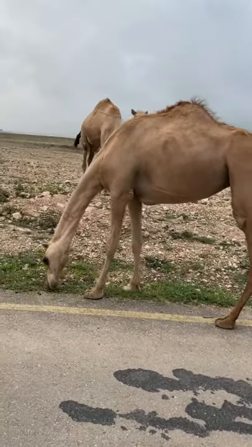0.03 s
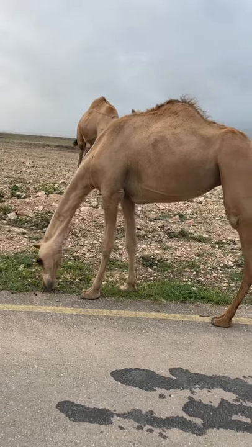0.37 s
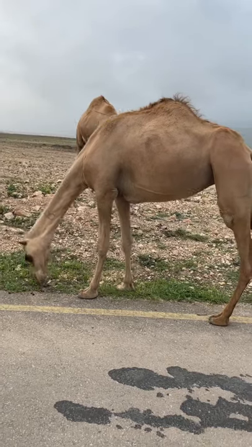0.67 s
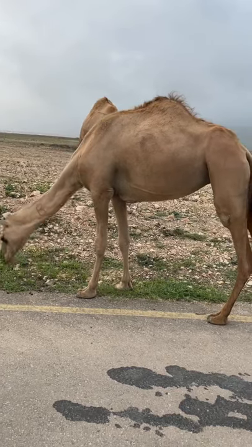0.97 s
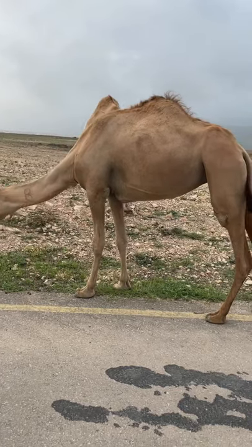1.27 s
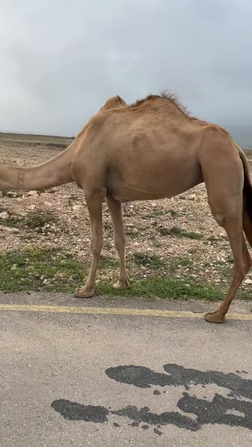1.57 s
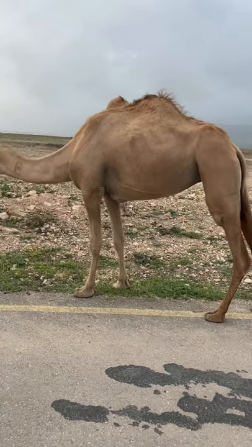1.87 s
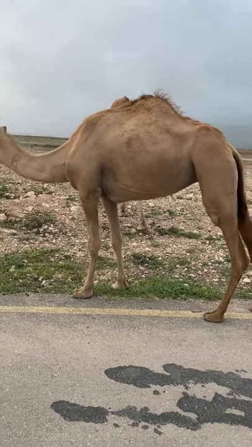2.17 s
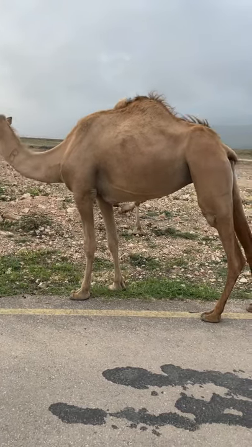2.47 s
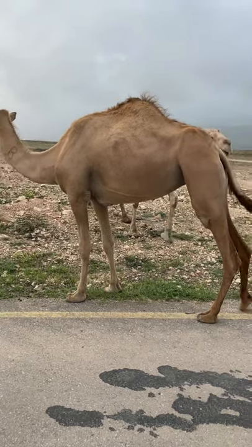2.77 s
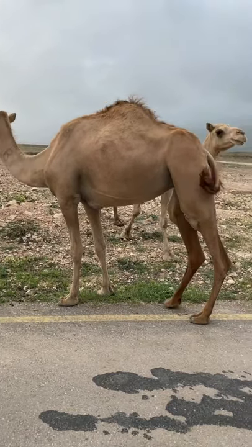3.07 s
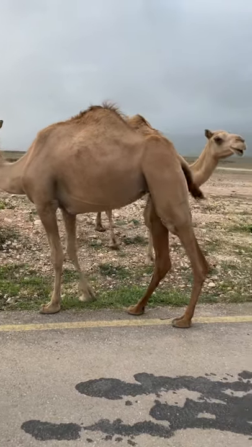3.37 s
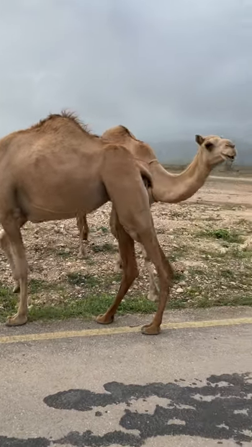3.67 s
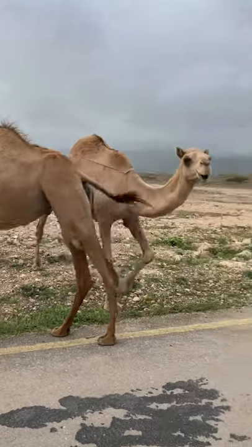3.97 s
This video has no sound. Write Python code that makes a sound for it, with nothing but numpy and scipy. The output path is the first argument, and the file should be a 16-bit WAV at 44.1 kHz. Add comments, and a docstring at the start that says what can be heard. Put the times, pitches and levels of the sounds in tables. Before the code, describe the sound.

A car idles close by with a low, steady throb and faint hiss. Light wind rumbles on the microphone, sputtering later on, while camels scuff grit and click small stones at the roadside, with one dull footfall.

```python
"""A six-cylinder car idles close by while camels shuffle along the roadside in a light wind.
The engine's firings make a low throb, and it chirps and taps once a cycle over an even hiss.
Padded feet scuff the grit, click small stones and land once with a dull knock.
Wind rumbles, buffets and sputters on the microphone. The low sounds spread wide; near the end
a low rush swells and the phone's wind filter pulls them to the centre."""
import sys
import numpy as np
from scipy import signal
from scipy.fft import rfft, irfft, next_fast_len
from scipy.io import wavfile
from scipy.ndimage import uniform_filter1d, map_coordinates

SR = 44100
rng = np.random.default_rng(int(sys.argv[2]) if len(sys.argv) > 2 else 0)


def waveform_to_disk(signal):
    """Save audio, clipped to [-1, 1], as 16-bit WAV at the path in sys.argv[1]."""
    frames = np.transpose(np.atleast_2d(signal))
    scaled = np.clip(frames, -1, 1) * 32767
    samples = np.round(scaled).astype(np.int16)
    wavfile.write(sys.argv[1], SR, samples)


N = 176400
T = np.arange(N) / SR
CYCLE_HZ, FIRINGS_PER_CYCLE = 5.592, 6
FIRING_HZ = CYCLE_HZ * FIRINGS_PER_CYCLE
EDGE_STEEPNESS = 9  # how sharp the wind filter's edge and the top of the low rush are

# Tones in the exhaust's throb: multiple_of_firing_rate, level_db
EXHAUST_TONES = [(1, 5), (1.5, -5.5), (2, -2.5), (2.5, -6.5), (3.5, -8.5), (4, -5.5), (5, -6.5), (6, -16),
                 (7, -18.5)]
# Noises in every engine cycle: offset_s, pitch_hz, width_hz, half_length_s, level_db
CYCLE_NOISES = [(0.1194, 1530, 320, 0.0064, -62.5), (0.1336, 1444, 75, 0.0089, -66),
                (0.0325, 3400, 450, 0.0018, -73.5), (0.1366, 2130, 140, 0.011, -69)]
# Louder engine chirps: peak_s, level_db
LOUD_CHIRPS = [(.125, -60), (1.015, -59.5), (1.56, -62), (2.635, -59.5)]

# Tone colours, or how strong each sound is from low to high: pitch_hz, level_db
# "Centre" is the same in both ears; "side" is opposite in the two, which sounds wide.
AIR_CENTRE_COLOUR = [(750, -59), (950, 1.5), (1150, 2.5), (1450, 4.5), (1850, -0.5), (2400, -0.5),
                     (3100, -10), (5300, -12), (7000, -18.5), (8800, -20), (10000, -62.5), (16000, -29.5)]
AIR_SIDE_COLOUR = [(350, -36), (650, 0.5), (1000, -1.5), (1450, -2), (2000, -11.5), (2900, -5), (4500, -21),
                   (7200, -14.5), (11000, -40)]
MURMUR_COLOUR = [(250, -27.5), (450, 19.5), (750, 25), (1000, 25), (1400, -39.5)]  # dull part of the air
FIZZ_COLOUR = [(4500, -7), (6500, -5.5), (9000, 10), (12000, 2.5), (16000, -1)]  # bright part of the air
RUMBLE_COLOUR = [(20, -37.5), (30, -18.5), (50, 10.5), (70, 11.5), (100, 3.5), (140, -13.5), (220, -30),
                 (400, -99)]  # deepest wind
FULL_WIND_COLOUR = [(70, -12.5), (130, 7), (200, -2), (300, -8.5), (450, -14.5), (620, -18.5), (800, -31),
                    (1200, -100)]  # fuller rush above the rumble
SIDE_WIND_COLOUR = [(22, -38.5), (40, -12.5), (68, 1), (110, -4.5), (170, -9), (260, -11), (420, -18),
                    (750, -21), (1200, -35), (1800, -62)]
SAND_COLOUR = [(2000, -14), (3500, 5), (5500, 7.5), (8000, 4), (11000, -12.5), (16000, 4.5)]
SCRAPE_COLOUR = [(200, -9.5), (600, 8.5), (1500, 14.5), (2200, 8), (3500, 4.5), (6000, -9.5), (9000, -6),
                 (16000, -37)]
WIND_POP_COLOUR = [(50, -6.5), (150, 19.5), (350, 8), (700, 11), (1300, 6.5), (1650, -9), (2100, -34.5)]
THUD_COLOUR = [(200, -19), (500, 11), (900, 6.5), (1600, -1), (3000, -7.5), (8000, -31)]
LOW_RUSH_COLOUR = [(100, -10), (200, 8.5), (300, 7.5), (450, 1.5), (620, -1.5), (900, -11)]

# How the lasting sounds rise and fall: time_s, level_db
EXHAUST_LEVELS = [(0, -46), (2.4, -45), (2.7, -54.5), (3.0, -41), (4, -42)]
MURMUR_LEVELS = [(0, -67.5), (2.35, -68.5), (2.8, -67), (2.93, -75.5), (3.24, -65), (3.3, -86),
                 (3.6, -78.5), (4, -67)]
FIZZ_LEVELS = [(0, -80), (1.5, -78.5), (2.6, -75), (3.6, -74), (4, -79.5)]
RUMBLE_LEVELS = [(0, -44), (.4, -46), (1.4, -47), (2.3, -46.5), (2.75, -43.5), (2.95, -47.5), (4, -44)]
FULL_WIND_LEVELS = [(0, -49), (.5, -51.5), (2.35, -50), (2.55, -57), (2.8, -58), (2.95, -50), (3.28, -54),
                    (3.5, -45.5), (4, -45)]
LOW_WIDTH_LEVELS = [(0, 1), (2.35, 0), (2.52, 5), (2.85, 6), (2.97, -3.5), (3.3, -2.5), (3.5, -19.5)]  # side part of the low sounds
LOW_RUSH_LEVELS = [(3.0, -80), (3.3, -52.5), (3.52, -49.5), (3.8, -51), (4, -50)]

# Swirls of wind hitting the microphone: peak_s, half_length_s, level_db
WIND_BUFFETS = [(0.033, 0.014, -34), (0.106, 0.013, -34), (0.581, 0.026, -38.5), (1.001, 0.02, -34.5),
                (1.151, 0.016, -36), (1.445, .012, -36), (2.349, 0.019, -36.5), (2.522, 0.012, -35.5),
                (2.759, 0.028, -36), (3.701, 0.0052, -29)]
# Wind pops at the microphone: start_s, level_db
WIND_POPS = [(2.589, -43), (2.617, -43.5), (2.6487, -43.5), (2.7105, -43.5), (2.725, -43.5), (2.7425, -45),
             (2.7725, -45.5), (2.7873, -42.5), (2.8048, -42.5), (2.824, -45), (2.8412, -44), (2.8696, -45),
             (3.2918, -42), (3.306, -43.5), (3.322, -39.5), (3.337, -45.5), (3.3509, -42), (3.3658, -42),
             (3.383, -40), (3.407, -39.5), (3.4284, -38.5), (3.4568, -41.5), (3.483, -41), (3.5194, -40.5),
             (3.5466, -38), (3.5733, -40), (3.5938, -40), (3.609, -41.5), (3.6272, -44.5), (3.6485, -40.5),
             (3.6713, -41), (3.6926, -40), (3.7165, -42.5), (3.7359, -42), (3.7636, -41), (3.7817, -42),
             (3.807, -45.5), (3.829, -43), (3.8511, -41.5), (3.8758, -42.5), (3.8954, -40), (3.914, -41),
             (3.9789, -40)]
# Stones clicking underfoot: start_s, level_db, pitch_hz
STONE_TICKS = [(.215, -51, 2300), (1.603, -51.5, 3800), (2.415, -49, 3470), (2.817, -49, 3370),
               (2.943, -43.5, 3400), (3.104, -46.5, 4500), (3.476, -51.5, 3600)]
# Dragging feet: peak_s, rise_s, fall_s, level_db, hiss_over_scrape_db
FOOT_SCUFFS = [(0.216, 0.00052, 0.0043, -48.5, -23.5), (1.341, 0.0012, 0.017, -50.5, -20),
               (1.361, 0.008, 0.02, -55.5, -4), (1.915, 0.018, 0.014, -61, -8.5),
               (2.241, 0.024, 0.036, -63.5, -1.5), (2.423, .012, 0.086, -59.5, -6),
               (2.70, 0.059, 0.057, -72.5, 5.5), (2.96, 0.017, 0.033, -54, -9),
               (3.101, 0.026, 0.0041, -55, -6), (3.145, 0.02, 0.039, -53.5, 5.5),
               (3.215, 0.005, 0.029, -59, 0), (3.335, 0.017, 0.02, -64.5, 3),
               (3.592, 0.005, .008, -51, -12.5), (3.725, 0.0006, 0.0061, -49.5, -15.5),
               (3.93, 0.02, 0.12, -74, 10.5)]
# The two knocks of a landing foot: start_s, level_db
FOOT_KNOCKS = [(2.921, -42.5), (2.937, -46)]

# Stereo likeness of the scuffing noise: pitch_hz, likeness (1 same, -1 opposite)
# The phone's audio coding leaves the top treble opposite in the two ears.
STEREO_LIKENESS = [(500, -0.3), (2000, 0.6), (4700, 0.5), (7000, -0.1), (9500, -0.99), (16000, -0.84)]
# Left-right balance of the clatter, chirps, air and feet: pitch_hz, left_over_right_db
BALANCE = [(150, -3.5), (380, -0.5), (700, -5.5), (1290, -4.5), (2380, 0.5), (4400, -1.5)]
# Brief dips in the centre: time_s, half_length_s, pitch_hz, half_width_octaves, depth_db
CENTRE_DIPS = [(2.69, .09, 400, .75, 14), (2.86, .015, 750, .5, 15), (3.33, .055, 760, .25, 26)]
# The phone's wind filter; below this climbing pitch both ears hear the same: time_s, pitch_hz
WIND_FILTER_EDGE = [(3.3, 10), (3.38, 240), (3.52, 540), (4, 740)]


def amp(db):
    """Turn decibels into a number to multiply by."""
    return 10 ** (np.asarray(db) / 20)


def unit(x):
    """Scale a sound so its average strength (rms) is 1."""
    return x / np.sqrt(np.mean(x ** 2) + 1e-20)


def along(rows, hz):
    """Read between (pitch_hz, value) rows, with octaves evenly spaced."""
    pitches, values = np.transpose(rows)
    return np.interp(np.log(hz + 1), np.log(pitches + 1), values)


def level(rows):
    """A volume for every sample, from (time_s, level_db) rows."""
    return amp(np.interp(T, *np.transpose(rows)))


def wobble(per_s):
    """A smooth curve through per_s random values each second."""
    return map_coordinates(rng.standard_normal(int(N * per_s / SR) + 4), [T * per_s])


def swell(peak_s, half_length_s):
    """A smooth rise and fall in volume."""
    return np.exp(-.5 * ((T - peak_s) / half_length_s) ** 2)


def strike(start_s, fade_s, attack_s=.0006):
    """The volume of a hit: a quick rise, then a fall of 60 dB in fade_s."""
    age = np.maximum(T - start_s, 0)
    return (1 - np.exp(-age / attack_s)) * amp(-60 * age / fade_s)


def stereo(centre, side):
    """Make left and right from centre and side."""
    return np.array([centre + side, centre - side])


def filtered(x, response):
    """Multiply each pitch in a sound by response(hz)."""
    size = next_fast_len(N + SR // 2)
    return irfft(rfft(x, size) * response(np.fft.rfftfreq(size, 1 / SR)), size)[..., :N]


def swept(x, response):
    """A moving filter: multiply each pitch at each moment by response(hz, time_s)."""
    hz, time_s, slices = signal.stft(x, SR, nperseg=1024, noverlap=768)
    slices = slices * response(hz[:, None] + 1, time_s)
    return signal.istft(slices, SR, nperseg=1024, noverlap=768)[1][:N]


def rush(colour, patchy_db=1):
    """Rushing noise in a given colour, with slightly louder and softer patches."""
    slices = signal.stft(rng.standard_normal(N), nperseg=512)[2]
    patches = uniform_filter1d(rng.standard_normal(slices.shape), size=6, axis=0)  # blur in pitch
    patches = uniform_filter1d(patches, size=10, axis=1)  # blur in time
    noise = signal.istft(slices * amp(patchy_db * unit(patches)), nperseg=512)[1][:N]
    return unit(filtered(noise, lambda hz: amp(along(colour, hz))))


def grit(colour, grain_db=2):
    """Grainy stereo noise for the foot sounds."""
    def colour_and_spread(hz):
        angle = np.arccos(np.clip(along(STEREO_LIKENESS, hz), -1, 1)) / 2
        return amp(along(colour, hz)) * [np.cos(angle), np.sin(angle)]
    grains = rng.standard_normal((2, N)) * amp(grain_db * wobble(600))
    return unit(stereo(*filtered(grains, colour_and_spread)))


def exhaust(phase_scatter=0.65):
    """The firings make a low throb: slightly unsteady tones tied to the firing rate."""
    phase = 2 * np.pi * FIRING_HZ * T + .05 * wobble(3)
    tones = sum(-amp(db + wobble(1.8)) * np.cos(multiple * phase + phase_scatter * rng.normal())
                for multiple, db in EXHAUST_TONES)
    return unit(tones) * level(EXHAUST_LEVELS)


def air(centre_db=-62.5, side_db=-65.5, pulse_depth=0.072):
    """Engine bay and open land hiss, pulsing lightly twice a firing; a murmur and a fizz drift."""
    pulse = 1 + pulse_depth * np.cos(2 * np.pi * 2 * FIRING_HZ * T)
    centre_hiss = amp(centre_db) * rush(AIR_CENTRE_COLOUR) * pulse
    murmur = rush(MURMUR_COLOUR) * level(MURMUR_LEVELS)
    side_hiss = amp(side_db) * rush(AIR_SIDE_COLOUR)
    fizz = rush(FIZZ_COLOUR) * level(FIZZ_LEVELS)
    return stereo(centre_hiss + murmur, side_hiss + fizz)


def wind_rumble():
    """Wind on the microphone makes a deep, lasting rumble."""
    return rush(RUMBLE_COLOUR) * level(RUMBLE_LEVELS)


def throb_and_wind(side_db=-50, left_share=0.29, right_share=0.38):
    """The low sounds: exhaust and deep wind lean left, fuller wind right; the low rush is central."""
    bass = exhaust() + wind_rumble() + wind_buffets()
    full_wind = rush(FULL_WIND_COLOUR) * level(FULL_WIND_LEVELS)
    side = rush(SIDE_WIND_COLOUR) * amp(side_db) + left_share * bass - right_share * full_wind
    return stereo(bass + full_wind + low_rush(), side * level(LOW_WIDTH_LEVELS))


def engine_clatter(side_share=0.82):
    """Chirps and taps come back at the same points of every engine cycle."""
    out = np.zeros((2, N))
    for offset_s, pitch_hz, width_hz, half_length_s, db in CYCLE_NOISES:
        away_s = (((T - offset_s) * CYCLE_HZ + .5) % 1 - .5) / CYCLE_HZ  # from the nearest repeat
        bursts = amp(db) * np.exp(-.5 * (away_s / half_length_s) ** 2)
        band = lambda hz: 1 / (1 + (2 * (hz - pitch_hz) / width_hz) ** 2)
        centre, side = unit(filtered(rng.standard_normal((2, N)), band))
        out += stereo(centre, side_share * side) * bursts
    return out


def wind_buffets(typical_hz=64.1):
    """Swirls of air hit the microphone, each a low bump just a few waves long."""
    out = np.zeros(N)
    for peak_s, half_length_s, db in WIND_BUFFETS:
        detune, shift = rng.standard_normal(2)
        pitch_hz = typical_hz * np.exp(.1 * detune)
        wave = np.cos(2 * np.pi * pitch_hz * (T - peak_s) + .5 * shift)
        out -= amp(db) * swell(peak_s, half_length_s) * wave
    return out


def engine_chirps(pitch_hz=1500, width_hz=330, half_length_s=0.012):
    """Now and then the engine's chirp comes out louder, as a short rough buzz."""
    band = lambda hz: np.exp(-.5 * (2 * (hz - pitch_hz) / width_hz) ** 2)
    centre, side = unit(filtered(rng.standard_normal((2, N)), band))
    bursts = sum(amp(db) * swell(peak_s, half_length_s) for peak_s, db in LOUD_CHIRPS)
    return stereo(centre, .5 * side) * bursts


def stone_ticks(half_width_octaves=.6):
    """Single stones click underfoot, each around its own pitch."""
    out = np.zeros((2, N))
    for start_s, db, pitch_hz in STONE_TICKS:
        band = lambda hz: 1 / (1 + (np.log2((hz + 1) / pitch_hz) / half_width_octaves) ** 2)
        crack = unit(filtered(grit(SAND_COLOUR), band))
        out += amp(db) * strike(start_s, fade_s=0.012) * crack
    return out


def foot_scuffs():
    """Padded feet drag over grit: a scrape with a sandy hiss on top."""
    scrape_level, hiss_level = np.zeros(N), np.zeros(N)
    for peak_s, rise_s, fall_s, db, hiss_db in FOOT_SCUFFS:
        age = T - peak_s
        stroke = amp(db) * np.where(age < 0, swell(peak_s, rise_s), np.exp(-abs(age) / fall_s))
        scrape_level += stroke
        hiss_level += stroke * amp(hiss_db)
    return scrape_level * grit(SCRAPE_COLOUR) + hiss_level * grit(SAND_COLOUR)


def wind_sputter(lag_cycles=1.5):
    """Wind makes small falling pops on the microphone, opposite in the two ears."""
    def pop(hz):
        lag = np.exp(-2j * np.pi * lag_cycles * np.log(hz + 1))  # low pitches come later
        return amp(along(WIND_POP_COLOUR, hz)) * lag
    kicks = np.zeros(N)
    for start_s, db in WIND_POPS:
        kicks[int(start_s * SR)] = amp(db)
    pop_peak = np.abs(irfft(pop(np.fft.rfftfreq(SR, 1 / SR)))).max()
    return stereo(0, filtered(kicks, pop) / pop_peak)


def hollow_centre(centre):
    """A few ranges of pitch dip briefly in the centre of the sound."""
    def dips(hz, time_s):
        cut_db = 0
        for dip_s, half_length_s, pitch_hz, octaves, depth_db in CENTRE_DIPS:
            time_away = (time_s - dip_s) / half_length_s
            pitch_away = np.log2(hz / pitch_hz) / octaves
            cut_db += depth_db * np.exp(-.5 * (time_away ** 2 + pitch_away ** 2))
        return amp(-cut_db)
    return swept(centre, dips)


def footfall():
    """A soft foot lands with a dull double knock."""
    knocks = sum(amp(db) * strike(start_s, fade_s=.03) for start_s, db in FOOT_KNOCKS)
    return grit(THUD_COLOUR) * knocks


def edge_hz(time_s):
    """The pitch of the wind filter's edge at a given time."""
    return np.interp(time_s, *np.transpose(WIND_FILTER_EDGE))


def low_rush(above_edge_hz=230):
    """A low rush swells near the end and brightens as the wind filter's edge climbs."""
    opening = lambda hz, time_s: 1 / (1 + (hz / (edge_hz(time_s) + above_edge_hz)) ** EDGE_STEEPNESS)
    return swept(rush(LOW_RUSH_COLOUR), opening) * level(LOW_RUSH_LEVELS)


def wind_filter(side):
    """The phone's wind filter cuts the sides below a climbing pitch, so the low sounds turn mono."""
    return swept(side, lambda hz, time_s: 1 / (1 + (edge_hz(time_s) / hz) ** EDGE_STEEPNESS))


def scene():
    """Mix engine, feet and wind; the middle pitches lean right."""
    upper = engine_clatter() + engine_chirps() + air() + foot_scuffs() + footfall() + stone_ticks()
    upper = filtered(upper, lambda hz: amp(np.outer([.5, -.5], along(BALANCE, hz))))
    left, right = throb_and_wind() + wind_sputter() + upper
    return stereo(hollow_centre((left + right) / 2), wind_filter((left - right) / 2))


def record(dry, fade_in_s=.008, top_hz=15750):
    """Start softly and cut off the very highest pitches."""
    return filtered(dry * np.minimum(T / fade_in_s, 1), lambda hz: hz < top_hz)


dry = scene()
out = record(dry)
waveform_to_disk(out)
```